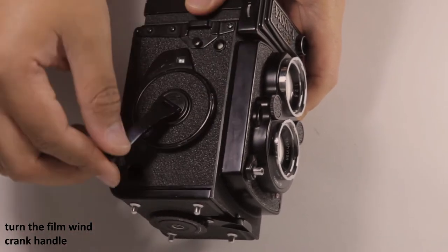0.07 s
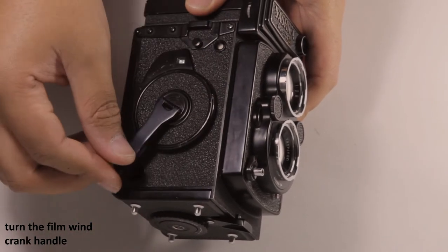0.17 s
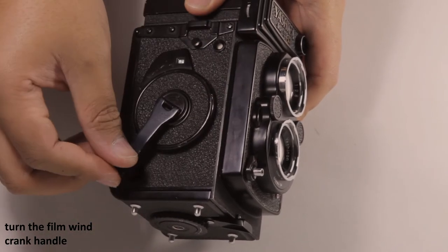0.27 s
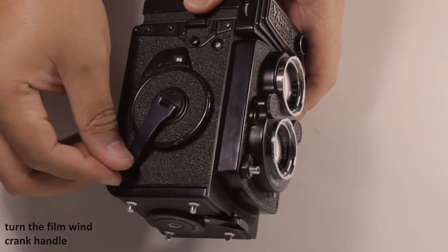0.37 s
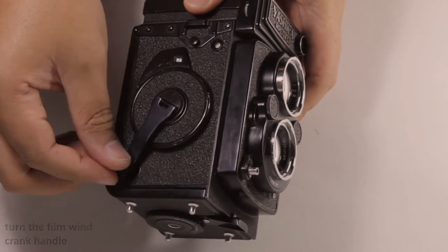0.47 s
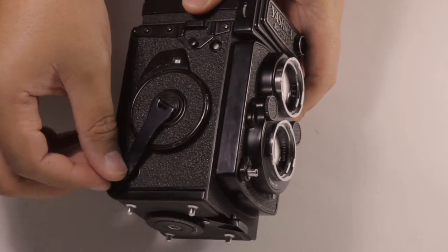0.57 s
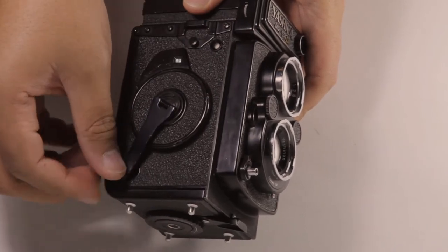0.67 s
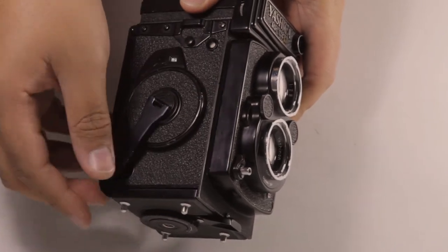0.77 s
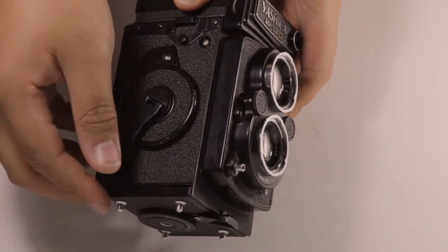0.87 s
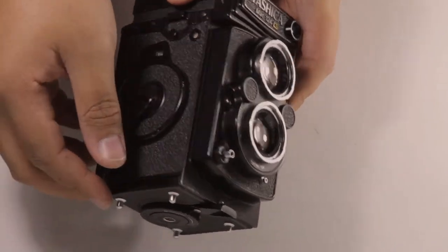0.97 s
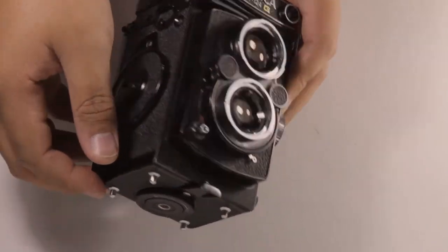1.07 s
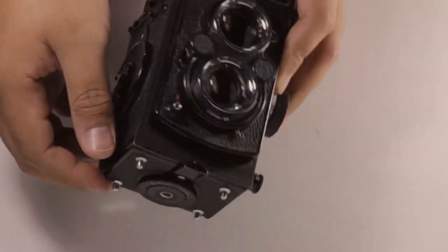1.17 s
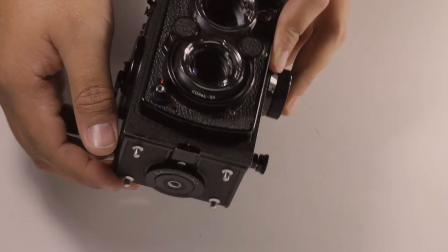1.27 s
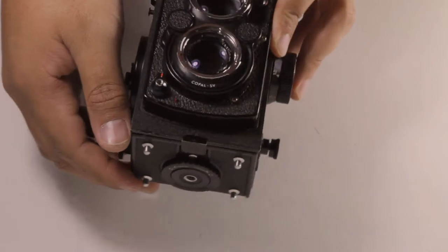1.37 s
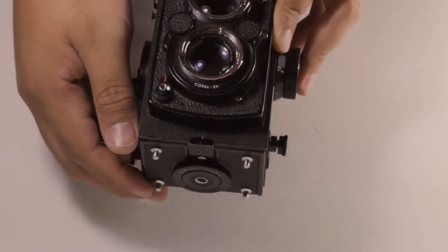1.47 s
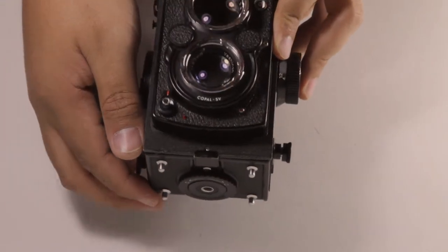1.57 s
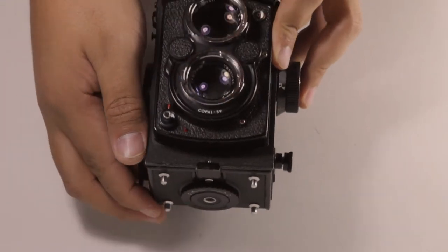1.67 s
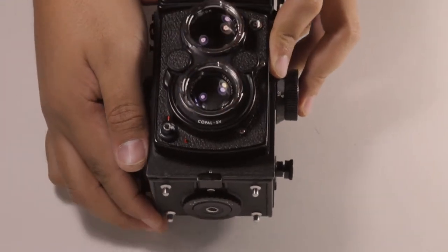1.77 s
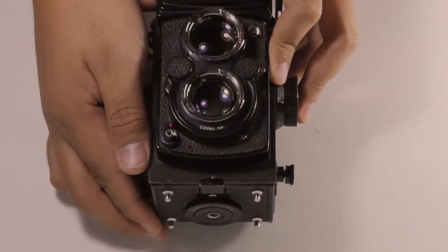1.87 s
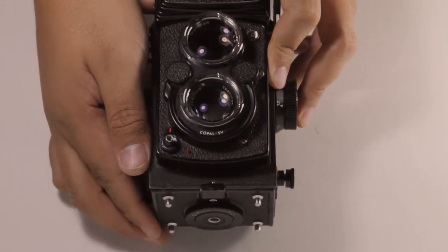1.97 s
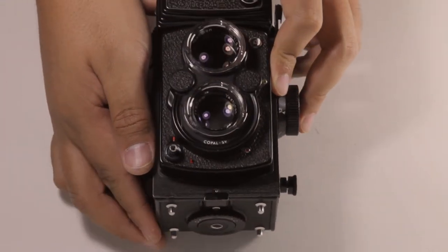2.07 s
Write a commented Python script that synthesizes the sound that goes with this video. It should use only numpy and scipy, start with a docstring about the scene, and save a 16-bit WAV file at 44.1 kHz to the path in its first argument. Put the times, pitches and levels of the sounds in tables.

```python
"""Winding a film camera

Hands work the winding crank of a metal twin-lens film camera, close by in a small quiet room.
A catch snaps, gears chatter, the crank knocks and a pawl ticks: noise bursts through each part's resonances.
A spring zings thinly, as noise in a narrow resonance of sinking pitch.
Fingers slide over the case as the camera is turned round and gripped again: grainy noise, swelling and fading.
Reflections, a short reverberation and steady room noise surround it."""
import sys
import numpy as np
from scipy import signal
from scipy.fft import rfft, irfft
from scipy.io import wavfile
from scipy.ndimage import uniform_filter1d, minimum_filter1d

SR = 44100
rng = np.random.default_rng(int(sys.argv[2]) if len(sys.argv) > 2 else 0)


def generate_wav(sig):
    """Save sig (samples, or channels by samples) to the path in sys.argv[1] as 16-bit PCM at SR."""
    pcm = np.round(np.clip(np.atleast_2d(sig).T, -1, 1) * 32767).astype(np.int16)
    wavfile.write(sys.argv[1], SR, pcm)


N = 92610  # length of the scene in samples

# Snaps of the catch: start_s, energy_db, brightness_db_per_octave
SNAPS = [(.1267, -19, 1.5), (.2114, 13, 1), (.346, -13.5, -1), (.3533, -28, 0), (.3907, -21, -1)]
# Broad colour of the catch: freq_hz, level_db
CATCH_COLOUR = [(150, -50), (850, -31), (1650, -16), (2400, -17), (3600, -9.5), (4900, -17), (6800, -7.5),
                (8000, -11.5), (9300, -3), (13800, -3), (16000, -10.5)]
# Ringing modes of the catch: freq_hz, level_db (against the broad colour), ring_s (longer is narrower)
CATCH_MODES = [(1235, -15, 0.036), (1198, -28, .2), (1777, -21.5, 0.021), (3610, -20, 0.015),
               (6720, -19, .009), (9350, -15.5, .02), (12170, -15, .012)]
# Burst of the catch, before it is flattened and faded: crack_t60_s, ring_t60_s, ring_db
CATCH_DECAY = (0.0058, 0.02, 0.5)


def catch():
    """The catch snaps over, a hard crack with a bright metal ring."""
    return strikes(SNAPS, CATCH_COLOUR, CATCH_MODES, CATCH_DECAY)


# Gear teeth chattering as the crank moves: start_s, energy_db, brightness_db_per_octave
CHATTER = [(.3475, -11.5, 1.5), (.3505, -7, 1), (.3545, -14, 0.5), (.360, -15.5, -0.5)]
# Broad colour of the gears: freq_hz, level_db
GEAR_COLOUR = [(150, -16), (450, -17), (800, -7), (1350, 1), (2000, -4), (2700, -15), (6000, -13.5),
               (16000, -13)]
# Ringing modes of the gears: freq_hz, level_db (against the broad colour), ring_s (longer is narrower)
GEAR_MODES = [(794, -6.5, 0.022), (1307, 1, 0.026), (1430, -17, 0.04), (1895, -5, 0.042)]
# Burst of a gear tooth, before it is flattened and faded: crack_t60_s, ring_t60_s, ring_db
GEAR_DECAY = (0.0049, 0.044, -2)


def gears():
    """Gear teeth strike in quick succession and ring in the midrange."""
    return strikes(CHATTER, GEAR_COLOUR, GEAR_MODES, GEAR_DECAY)


# Knocks of the crank and case: start_s, energy_db, brightness_db_per_octave
KNOCKS = [(.3388, -21.5, -6), (.3677, -18, -5), (.383, -17, -6), (.5367, -2, 0), (1.828, -29, -4),
          (1.890, -18, -.3)]
# Broad colour of the crank: freq_hz, level_db
CRANK_COLOUR = [(150, -25), (420, -15), (750, -5.5), (1000, -6), (1400, 1.5), (2200, -5), (3500, -3),
                (4500, -7), (6000, -7.5), (8500, -14.5), (12500, -7), (14500, -15), (16000, -28)]
# Ringing modes of the crank: freq_hz, level_db (against the broad colour), ring_s (longer is narrower)
CRANK_MODES = [(762, -6, 0.022), (1640, -7.5, 0.0082), (2608, -10, 0.028), (3400, -12, 0.0064),
               (12100, -19, 0.018), (12700, -17, 0.027)]
# Burst of a knock, before it is flattened and faded: crack_t60_s, ring_t60_s, ring_db
CRANK_DECAY = (0.0063, 0.074, -5)


def crank():
    """The crank knocks against its stop, and the case knocks too."""
    return strikes(KNOCKS, CRANK_COLOUR, CRANK_MODES, CRANK_DECAY)


# Ticks of the pawl: start_s, energy_db, brightness_db_per_octave
TICKS = [(.7245, -1, 0)]
# Broad colour of the pawl: freq_hz, level_db
PAWL_COLOUR = [(150, -22), (800, -22), (1500, -15), (2700, -49), (7000, -34), (9500, -15), (11200, -1.5),
               (13000, -6), (14300, 1), (16000, -3.5)]
# Ringing modes of the pawl: freq_hz, level_db (against the broad colour), ring_s (longer is narrower)
PAWL_MODES = [(11400, -13, 0.009), (14000, -8, .025)]
# Burst of a tick, before it is flattened and faded: crack_t60_s, ring_t60_s, ring_db
PAWL_DECAY = (0.0033, 0.03, -9)


def pawl():
    """The small pawl ticks, very short and mostly treble."""
    return strikes(TICKS, PAWL_COLOUR, PAWL_MODES, PAWL_DECAY)


# Dull bumps of the mechanism in the hand: start_s, energy_db, brightness_db_per_octave
BUMPS = [(.3755, -30, -5), (.383, -18, -11), (.7372, -19, -2)]
# Broad colour of the bumps: freq_hz, level_db
BUMP_COLOUR = [(60, -16), (200, -5), (450, -0.5), (900, -15.5), (1700, -13), (3000, -42), (16000, -53)]
# Ringing modes of the bumps: freq_hz, level_db (against the broad colour), ring_s (longer is narrower)
BUMP_MODES = [(360, -10, .03)]
# Burst of a bump, before it is flattened and faded: crack_t60_s, ring_t60_s, ring_db
BUMP_DECAY = (0.0092, 0.018, 11)


def bumps():
    """The mechanism bumps dully in the hand, with little treble."""
    return strikes(BUMPS, BUMP_COLOUR, BUMP_MODES, BUMP_DECAY)


def strikes(events, colour, modes, decay, size=8192):
    """Each blow is a brief crack and a dense short ring passed through the part's body."""
    out = np.zeros(N)
    t = np.arange(size) / SR
    response = body(colour, modes)
    crack_t60, ring_t60, ring_db = decay
    crack = unit(np.exp(-np.log(1000) * t / crack_t60))
    ring = unit(np.exp(-np.log(1000) * t / ring_t60))
    envelope = np.hypot(crack, amp(ring_db) * ring)
    for start, energy_db, bright_db in events:
        burst = flattened(rng.standard_normal(size) * envelope)
        sound = causal(burst * np.exp(-t / ring_t60), response)
        tilt = [(1500, 0), (12000, 3 * bright_db)]  # three octaves apart
        add(out, start, amp(energy_db) * unit(coloured(sound, tilt)))
    return out


def body(colour, modes, size=16384):
    """A part's response: its broad colour with a peak for every mode."""
    f = abs(np.fft.fftfreq(size, 1 / SR))
    power = unit(amp(read(colour, f))) ** 2
    for hz, level_db, ring_s in modes:
        width = np.log(1000) / np.pi / ring_s
        peak = unit(1 / (1 + ((f - hz) / width) ** 2))
        power = power + (amp(level_db) * peak) ** 2
    return np.sqrt(power)


# Zings of the spring: start_s, length_s, pitch_hz (at the start), level_db
ZINGS = [(.392, 0.059, 12000, -54.5), (.548, 0.094, 11900, -58.5)]
ZING_SAG_HZ_PER_S, ZING_WIDTH_HZ = 13500, 110


def spring():
    """A thin whistle, noise in a narrow resonance that sinks as the spring slackens."""
    out = np.zeros(N)
    for start, length, top_hz, level_db in ZINGS:
        t = np.arange(int(length * SR)) / SR
        pitch = top_hz - ZING_SAG_HZ_PER_S * t
        tone = evened(resonate(rng.standard_normal(len(t)), pitch, ZING_WIDTH_HZ))
        swell = np.sin(np.pi * np.sqrt(t / length))  # fullest a quarter of the way in
        add(out, start, amp(level_db) * swell * tone)
    return out


# Slide of a finger over the case: peak_s, rise_s, fall_s, level_db
SLIDES = [(1.014, 0.029, 0.0046, -46)]
# Resonances of the case under that finger: freq_hz, width_hz, level_db
CASE = [(1270, 200, 6.5), (1590, 300, 1), (2260, 220, 2), (3160, 250, -2.5), (3960, 90, -3),
        (5060, 210, -11), (6400, 1200, -15), (8900, 120, -14), (11500, 3000, -21)]


def slide():
    """A finger slides over the case and excites its resonances."""
    return resonant_friction(SLIDES, CASE)


# Squeak of a fingertip as it grips: peak_s, rise_s, fall_s, level_db
SQUEAKS = [(2.064, 0.012, 0.013, -50.5)]
# Resonances of the squeak: freq_hz, width_hz, level_db
SQUEAK_PEAKS = [(4550, 600, -3), (5630, 350, -2), (13100, 600, 1)]


def squeak():
    """A gripping fingertip squeaks, grainy noise through a few high resonances."""
    return resonant_friction(SQUEAKS, SQUEAK_PEAKS)


# Rubs of the palm: peak_s, rise_s, fall_s, level_db
RUBS = [(.36, 0.022, 0.037, -46), (.95, 0.043, 0.037, -52.5), (1.835, 0.046, 0.087, -50.5),
        (1.908, 0.017, 0.0066, -47), (1.975, 0.032, 0.037, -50.5), (2.025, 0.045, 0.036, -46.5)]
# Colour of the rubs: freq_hz, level_db
RUB_COLOUR = [(30, -35), (110, -26), (250, -7.5), (550, -2), (1000, -7.5), (1800, -4.5), (2800, -16.5),
              (6000, -23), (12000, -31), (16000, -31.5)]


def rubs():
    """The palm rubs the case, a dull grainy noise."""
    return coloured_friction(RUBS, RUB_COLOUR)


# Brushes of dry fingertips: peak_s, rise_s, fall_s, level_db
BRUSHES = [(1.772, .006, 0.014, -47.5), (1.905, 0.017, 0.015, -57), (2.064, 0.017, .014, -52.5)]
# Colour of the brushes: freq_hz, level_db
BRUSH_COLOUR = [(500, -7), (2000, 0.5), (4500, -4), (8000, -6.5), (11500, -2), (13000, 2), (14500, -8),
                (16000, -6)]


def brushes():
    """Dry fingertips brush the case, a bright grainy noise."""
    return coloured_friction(BRUSHES, BRUSH_COLOUR)


def resonant_friction(strokes, peaks):
    """Skin friction heard through a set of resonances."""
    level, grit = friction(strokes)
    rings = sum(amp(db) * evened(resonate(grit, hz, width)) for hz, width, db in peaks)
    return level * evened(rings)


def coloured_friction(strokes, colour):
    """Skin friction with a broad colour."""
    level, grit = friction(strokes)
    return level * evened(coloured(grit, colour))


GRAIN_DB, GRAIN_S = 0.5, 0.0022  # rms depth of the level flutter, and its smoothing time


def friction(strokes):
    """The level that swells to each stroke's peak and dies away, and a grainy noise to go with it."""
    t = np.arange(N) / SR
    power = np.zeros(N)
    for peak, rise, fall, level_db in strokes:
        distance = np.maximum((peak - t) / rise, (t - peak) / fall)
        power += (amp(level_db) * np.exp(-distance)) ** 2
    grain = evened(uniform_filter1d(rng.standard_normal(N), max(int(GRAIN_S * SR), 1)))
    grit = rng.standard_normal(N) * amp(GRAIN_DB * grain)
    return np.sqrt(power), grit


# Early reflections: delay_s, level_db
ECHOES = [(.0028, -29.5), (.0084, -13.5), (0.013, -18)]
ECHO_SPREAD_S = 0.00065  # decay constant of each scattered reflection
# Reverberation time: freq_hz, t60_s
ROOM_T60 = [(200, .35), (1500, 0.35), (6000, 0.34), (11000, 0.29), (16000, 0.17)]
ROOM_DB, ROOM_BUILD_S = -13.5, 0.006  # energy of the tail, and its build-up time


def room(x, size=256):
    """Scattered reflections from the table and walls, with a short diffuse tail."""
    hz, t, z = signal.stft(rng.standard_normal(SR // 2), SR, nperseg=size)
    decay = np.exp(-np.log(1000) * t / read(ROOM_T60, hz)[:, None])
    tail = signal.istft(z * decay, SR, nperseg=size)[1]
    build = np.minimum(np.arange(len(tail)) / SR / ROOM_BUILD_S, 1) ** 2
    response = amp(ROOM_DB) * unit(tail * build)
    scatter = np.exp(-np.arange(size) / SR / ECHO_SPREAD_S)
    for delay, level_db in ECHOES:
        add(response, delay, amp(level_db) * unit(rng.standard_normal(size) * scatter))
    return signal.fftconvolve(x, response)[:N]


# Colour of the room noise: freq_hz, level_db
AIR = [(15, -41), (25, -12.5), (114, -1), (137, -6), (166, -4), (242, -4), (270, -12), (317, -2.5),
       (384, -5.5), (796, -5.5), (1440, -16.5), (1610, -16.5), (3820, -21.5), (12500, -25), (16000, -32)]
AIR_DB = -54.5  # rms level


def air():
    """Steady room noise and microphone hiss, as one coloured noise."""
    spectrum = rfft(rng.standard_normal(N))
    gain = amp(read(AIR, np.fft.rfftfreq(N, 1 / SR)))
    return amp(AIR_DB) * evened(irfft(spectrum * gain, N))


def amp(db):
    """Decibels to gain."""
    return 10 ** (np.asarray(db) / 20)


def unit(x):
    """Scales to an energy of one."""
    return x / np.sqrt(np.sum(x ** 2) + 1e-20)


def evened(x):
    """Scales to an rms of one."""
    return unit(x) * np.sqrt(len(x))


def read(points, hz):
    """Reads a table on a log-frequency axis."""
    f, value = np.transpose(points)
    return np.interp(np.log(hz + 1), np.log(f + 1), value)


def add(mix, s, sound):
    """Adds a sound into the mix at a time in seconds."""
    part = mix[max(round(s * SR), 0):][:len(sound)]
    part += sound[:len(part)]


def flattened(x):
    """Flattens a burst's spectrum but keeps its phases, which carry its timing."""
    return irfft(np.exp(1j * np.angle(rfft(x))), len(x))


def coloured(x, colour, size=4096):
    """Filters a sound by the colour in a table."""
    return causal(x, amp(read(colour, abs(np.fft.fftfreq(size, 1 / SR)))))


def causal(x, gain):
    """Filters by a gain given round the whole frequency circle, ringing only after the sound."""
    minimum_phase = np.exp(np.conj(signal.hilbert(np.log(gain))))
    taps = np.fft.ifft(minimum_phase).real
    return signal.fftconvolve(x, taps[:len(gain) // 2])[:len(x)]


def resonate(x, hz, width):
    """A resonance at a fixed or moving pitch: shift it down to 0 Hz, smooth, shift back."""
    turn = np.exp(2j * np.pi * np.cumsum(hz * np.ones(len(x))) / SR)
    r = np.exp(-np.pi * width / SR)
    return 2 * (turn * signal.lfilter([1 - r], [1, -r], x / turn)).real


def scene():
    """The camera and hands in the room."""
    mechanism = catch() + gears() + crank() + pawl() + bumps()
    hands = slide() + squeak() + rubs() + brushes()
    near = mechanism + spring() + hands
    return (near + room(near) + air())[None]


CEILING, LIMITER_S = .98, .0012  # peak level, and the smoothing time of the gain
EDGE_HZ = 16000


def record(dry):
    """A fast limiter turns down peaks above the ceiling, then a low-pass limits the band."""
    size = int(LIMITER_S * SR)
    gain = minimum_filter1d(CEILING / np.maximum(abs(dry), CEILING), 2 * size)
    gain = uniform_filter1d(uniform_filter1d(gain, size), size)
    low_pass = signal.firwin(255, EDGE_HZ, window=("kaiser", 8), fs=SR)
    return signal.oaconvolve(dry * gain, low_pass[None], "same")


dry = scene()
out = record(dry)
generate_wav(out)
```